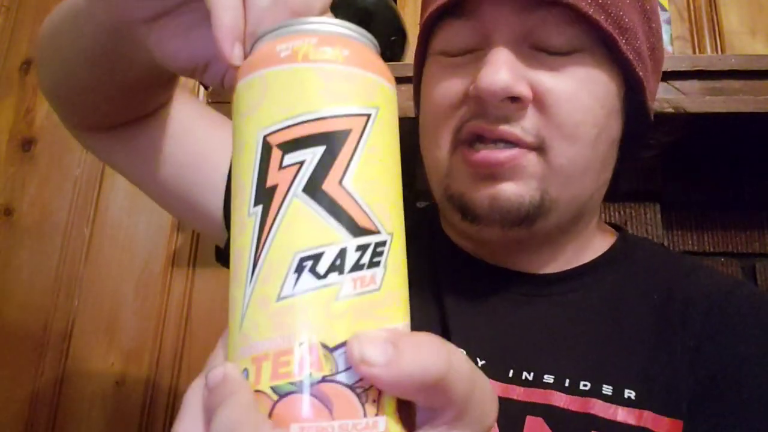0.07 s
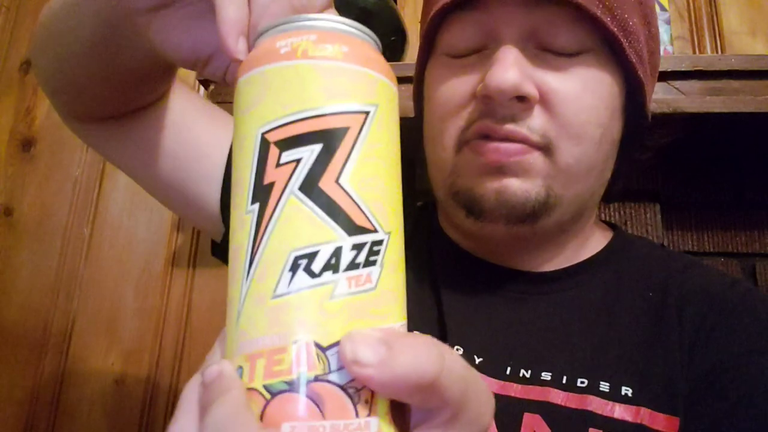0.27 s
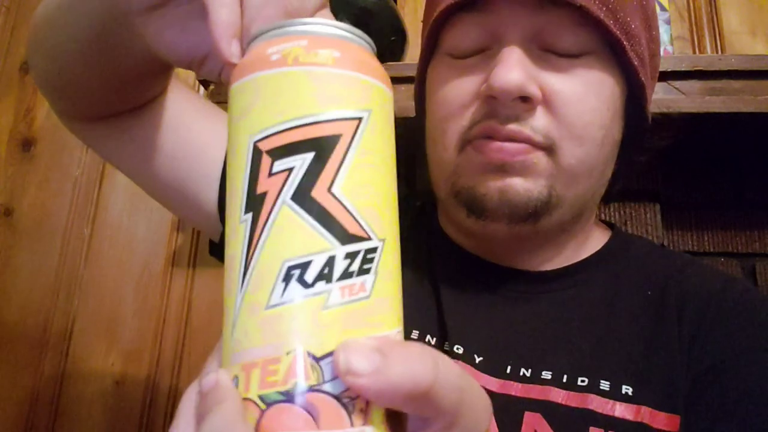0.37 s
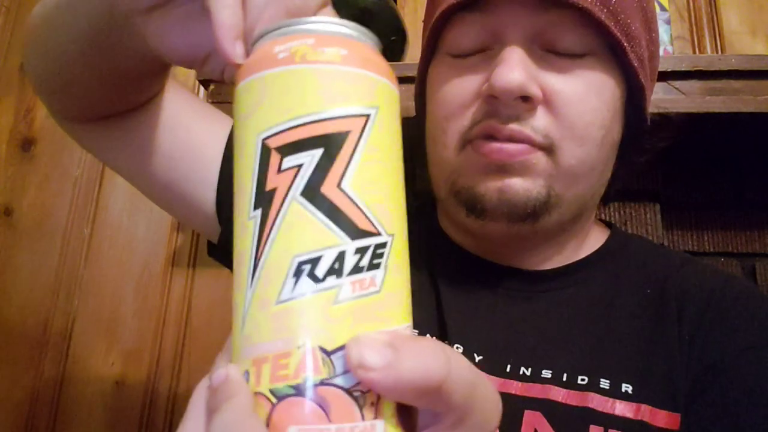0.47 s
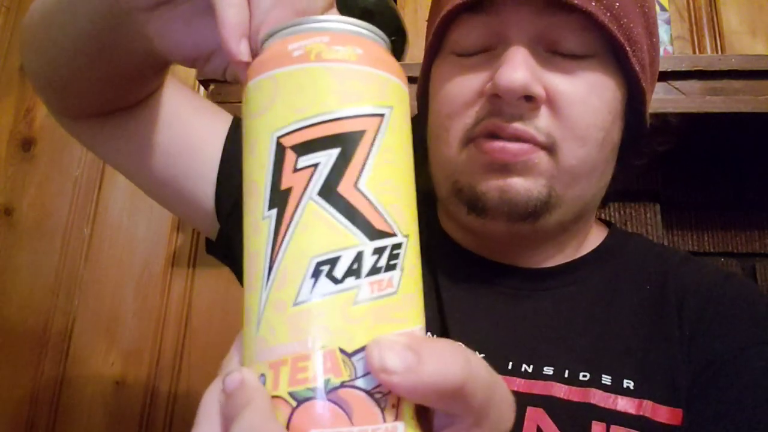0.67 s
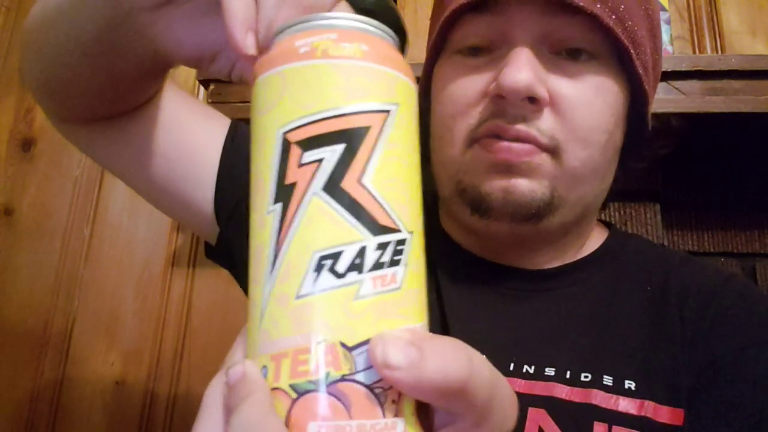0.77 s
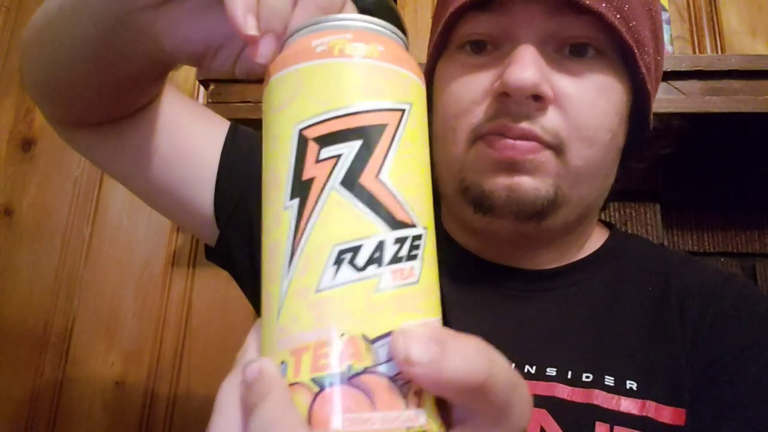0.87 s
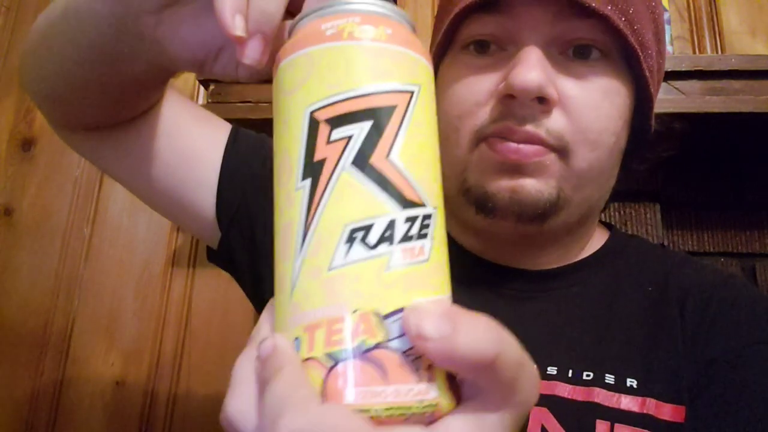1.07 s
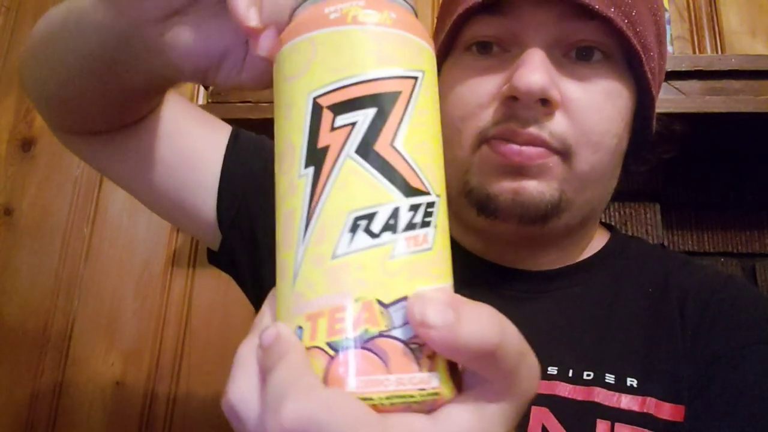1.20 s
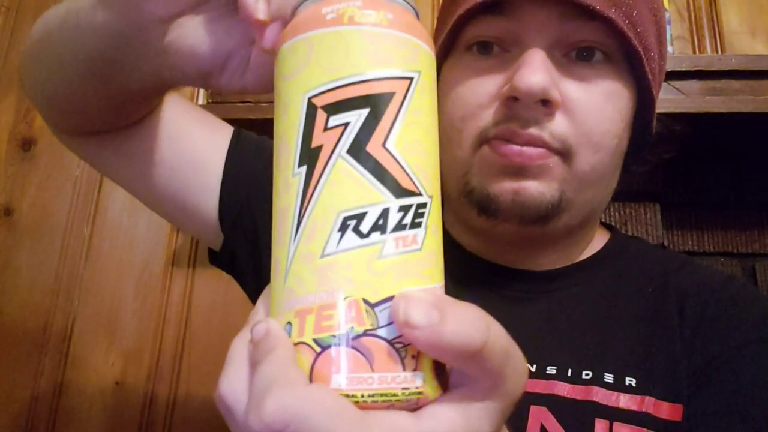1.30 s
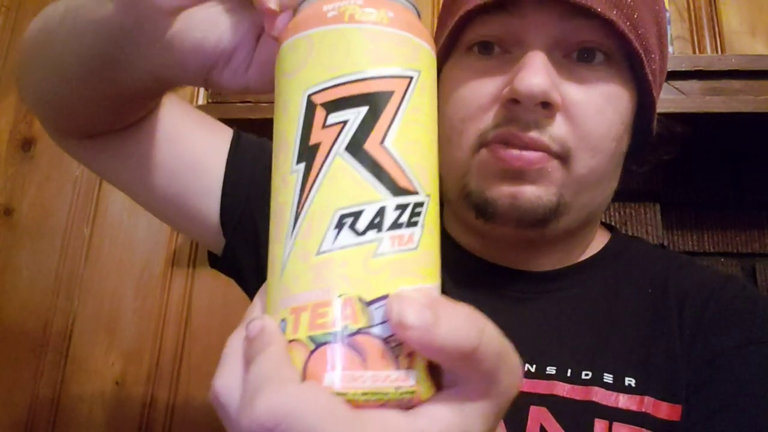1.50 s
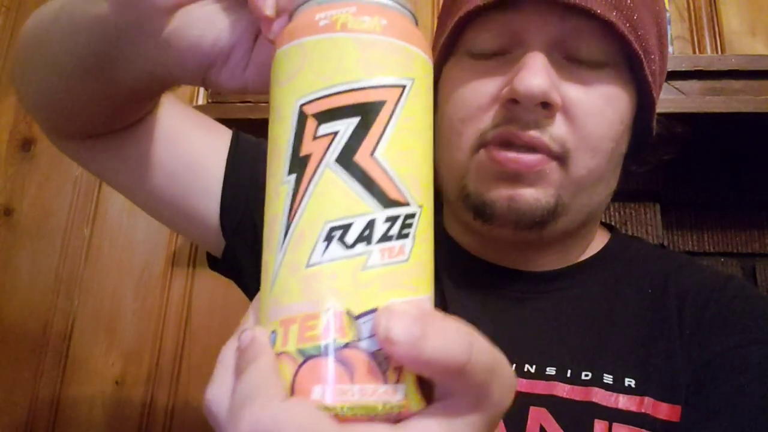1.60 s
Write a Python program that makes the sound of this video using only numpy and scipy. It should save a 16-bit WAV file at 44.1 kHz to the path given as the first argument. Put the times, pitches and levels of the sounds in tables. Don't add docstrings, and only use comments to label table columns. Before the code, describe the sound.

Fingernail picking a full can's tab: one bright click, later weaker clicks, over faint hiss

```python
import sys
import numpy as np
from scipy import signal
from scipy.fft import rfft, irfft
from scipy.io import wavfile
from scipy.ndimage import uniform_filter1d

SR = 44100
rng = np.random.default_rng(int(sys.argv[2]) if len(sys.argv) > 2 else 0)


def invert_db(level):
    return 10 ** (np.asarray(level, dtype=float) / 20)


def file_out(sig):
    cols = np.atleast_2d(sig).T
    lim = np.clip(cols, -1, 1)
    pcm = np.round(lim * 32767).astype(np.int16)
    wavfile.write(sys.argv[1], SR, pcm)


N = 72765

# (time [s], peak level [dB], treble [dB], low treble [dB], bass [dB])
NAIL_SLIPS = [(0.0181, -55.5, -14, 13.5, 14.5), (0.1898, -33.5, -15, 9.5, 15.5), (.2036, -15, 7, -19, -6.5),
              (.2038, -9, 0.5, 0.5, -10), (.2040, -13.5, 1.5, 1, -2), (0.205, -18.5, 5.5, 7.5, 0.5),
              (.630, -62, -12, 4.5, 0), (.8137, -31, -16.5, 10, 16), (1.018, -74, -12, 0, 28),
              (1.477, -59.5, 4, 2.5, -1.5), (1.530, -59, -12, -1.5, 0), (1.581, -56.5, -5, 4, 2.5),
              (1.594, -26.5, -6, -2, 4), (1.5950, -30.5, -4, 0.5, 2), (1.5987, -30.5, -1.5, -1, 3.5),
              (1.6008, -27, -3.5, -2, 3)]
# (pitch [Hz], width [Hz], left level [dB], right level [dB])
CAN_RINGS = [(735, 160, -36.5, -49.5), (1600, 500, -30.5, -42), (2300, 430, -24.5, -36),
             (3330, 580, -10.5, -26.5), (4130, 550, -6.5, -21), (5200, 610, 1.5, -18),
             (6000, 1200, -16, -32), (10330, 740, -20, -13.5), (12300, 1400, -19.5, -3),
             (13700, 1100, -15, -3), (15300, 1500, -19.5, -10)]
# (time [s], pitch [Hz], width [Hz], level [dB], left over right [dB])
EXTRA_RINGS = [(.0185, 5000, 300, -66, 12.5), (.2037, 1600, 295, -42, 13), (.2037, 1050, 404, -47, 13),
               (.2038, 5000, 1500, -15, 17), (.2042, 12300, 505, -20.5, -13.5),
               (.2044, 15400, 700, -27.5, -11.5), (.630, 5000, 297.3, -65, 13.5),
               (.8136, 522.5, 200.5, -59, 14.5), (.8136, 6630, 890, -48, 18),
               (.8136, 11000, 1200, -50.5, -8), (1.018, 1500, 250, -59, 15),
               (1.477, 14550, 1300, -47.5, -5), (1.5944, 9740, 900, -38.5, -19),
               (1.5999, 4320, 250, -37, 10), (1.6002, 2360, 297, -48, 13.5), (1.606, 4640, 300, -37.5, 13),
               (1.612, 758, 71, -56, 15.5)]
# (start [s], end [s], pitch [Hz], width [Hz], level [dB])
SKIN_RUB = (.05, .2, 1620, 120, -83)
# (pitch [Hz], time to fall 60 dB [s], left level [dB], right level [dB])
ROOM_TAIL = [(600, .3, -19, -13), (1500, .3, -20.5, -15.5), (3000, .32, -21, -15.5),
             (5000, .33, -22.5, -18), (7506, .28, -22, -15), (13000, .25, -19, -22.5)]
# (delay [s], level [dB])
WALL_ECHOES = [(.0070, -13.5), (.0085, -17), (.0150, -18.5), (0.0222, -20)]
# (time [s], level [dB])
MOTOR_LOAD = [(0.0, -72), (0.064, -71.5), (0.096, -81), (0.426, -56.5), (0.578, -64), (0.61, -73),
              (0.738, -62.5), (0.78, -76.5), (0.822, -67), (1.506, -71.5), (1.63, -67.5), (1.65, -90)]
# (pitch [Hz], width [Hz], level [dB])
MOTOR_DRONES = [(80.46, 61, -77), (115, 25, -79), (144, 22, -74), (180, 31, -81), (40, 30, -82)]
# (pitch [Hz], level per Hz [dB])
HISS_COLOUR = [(200, 2), (450, -5), (1400, -10.5), (3200, -14.5), (5500, -19), (8500, -22.5),
               (12500, -15.5), (16000, -18.5)]
# (pitch [Hz], left over right [dB])
HISS_SIDE = [(200, 7), (700, 6.5), (2400, 11.5), (4400, 8.5), (8100, 2.5), (15000, 1.5)]
# (pitch [Hz], likeness [0 to 1])
HISS_LIKENESS = [(100, .85), (300, 0.79), (650, .2), (1400, 0.01)]
# (pitch [Hz], width [Hz], level [dB])
HISS_BUMPS = [(1050, 200, 5.5), (2260, 500, 4)]

PATHS = 3


def ring(x, hz, width_hz):
    radius = np.exp(-np.pi * width_hz / SR)
    turn = 2 * np.pi * min(hz, 20000) / SR
    feed = [np.sin(turn), 0, -np.sin(turn)]
    memory = [1, -2 * radius * np.cos(turn), radius * radius]
    return signal.lfilter(feed, memory, x + 1e-18) / (2 * np.sin(turn))


def tab():
    bass_top_hz, middle_top_hz, treble_foot_hz = 2800, 4700, 8000
    spread_db = 2.39
    s, db, treble_db, middle_db, bass_db = np.transpose(NAIL_SLIPS)
    luck = rng.standard_normal((len(s), len(CAN_RINGS)))
    path = np.arange(len(s)) % PATHS
    out = np.zeros((PATHS, 2, N))
    for k, (hz, width_hz, left_db, right_db) in enumerate(CAN_RINGS):
        if hz < bass_top_hz:
            tilt_db = bass_db
        elif hz < middle_top_hz:
            tilt_db = middle_db
        elif hz > treble_foot_hz:
            tilt_db = treble_db
        else:
            tilt_db = 0
        strength = invert_db(db + tilt_db + spread_db * luck[:, k])
        clicks = np.zeros((PATHS, 1, N))
        clicks[path, 0, (s * SR).astype(int)] = strength * (-1) ** k
        out += ring(clicks, hz, width_hz) * invert_db(np.array([[left_db], [right_db]]))
    return signal.sosfilt(signal.butter(2, 598.8, "high", fs=SR, output="sos"), out)


def accents():
    out = np.zeros((PATHS, 2, N))
    for k, (s, hz, width_hz, db, pan_db) in enumerate(EXTRA_RINGS):
        click = np.zeros(N)
        click[int(s * SR)] = invert_db(db)
        out[k % PATHS] += ring(click, hz, width_hz) * invert_db(np.array([[.5], [-.5]]) * pan_db)
    return out


def at_hz(points, hz, axis=1):
    p = np.array(points)
    return np.interp(np.log(hz), np.log(p[:, 0]), p[:, axis])


def room(x):
    tail_start_s, tail_rise_s = .002, 0.00611
    t = np.arange(SR // 2) / SR
    swell = np.clip((t - tail_start_s) / tail_rise_s, 0, 1)
    answer = np.zeros((PATHS, 2, len(t)))
    edges = 300 * 2 ** np.arange(0, 6.1, .5)
    white = rng.standard_normal((2, PATHS, 2, len(t)))
    for k, (low, high) in enumerate(zip(edges, edges[1:])):
        hz = np.sqrt(low * high)
        band = signal.butter(2, [low, high], "band", fs=SR, output="sos")
        noise = signal.sosfilt(band, white[k % 2])
        sides_db = np.array([[at_hz(ROOM_TAIL, hz, axis=2)], [at_hz(ROOM_TAIL, hz, axis=3)]])
        fade = invert_db(-60 * t / at_hz(ROOM_TAIL, hz))
        answer += noise * invert_db(sides_db - 9) * swell * fade
    for delay, db in WALL_ECHOES:
        i = int(delay * SR)
        burst = rng.standard_normal((PATHS, 2, 30)) * np.exp(-np.arange(30) / 8)
        answer[..., i:i + 30] += invert_db(db - 6) * burst
    return signal.fftconvolve(x, answer, axes=2)[..., :N].sum(axis=0)


def pair(alike, pan_db, size):
    mid, side = rfft(rng.standard_normal((2, size)))
    alike = np.clip(alike, 0, .99)
    sign = np.array([[1], [-1]])
    both = np.sqrt(1 + alike) * mid + sign * np.sqrt(1 - alike) * side
    return both * invert_db(sign * pan_db / 2)


LOW_PAN_DB, LOW_ALIKE = 6.5, .7


def narrow(c_hz, width_hz):
    hz = np.fft.rfftfreq(N, 1 / SR)
    peak = 1 + ((hz - c_hz) / (width_hz / 2)) ** 2
    out = irfft(pair(LOW_ALIKE, LOW_PAN_DB, N) / peak, N)
    return out / np.std(out.mean(axis=0))


def squeak():
    start, end, hz, width_hz, db = SKIN_RUB
    share = np.clip((np.arange(N) / SR - start) / (end - start), 0, 1)
    return invert_db(db) * np.sin(np.pi * share) * narrow(hz, width_hz)


def rumble():
    motor_hz, motor_width_hz = 56.4, 6.4
    tone_share, drone_follows = .75, 0.23
    t = np.arange(N) / SR
    sides = invert_db(np.array([[.4], [-.6]]) * LOW_PAN_DB)
    tone = 1.6 * np.sin(2 * np.pi * motor_hz * t) * sides
    wavering = narrow(motor_hz, motor_width_hz)
    motor = np.sqrt(tone_share) * tone + np.sqrt(1 - tone_share) * wavering
    load_db = np.interp(t, *np.transpose(MOTOR_LOAD))
    drones = sum(invert_db(db) * narrow(hz, width_hz) for hz, width_hz, db in MOTOR_DRONES)
    drone_load_db = drone_follows * (load_db - load_db.mean())
    return invert_db(load_db) * motor + invert_db(drone_load_db) * drones


def hiss():
    hz = np.fft.rfftfreq(N, 1 / SR) + 1
    humps_db = sum(db * np.exp(-((hz - c_hz) / w_hz) ** 2) for c_hz, w_hz, db in HISS_BUMPS)
    low_cut = np.sqrt(1 + (170 / hz) ** 8)
    shape = invert_db(at_hz(HISS_COLOUR, hz) + humps_db) / low_cut
    noise = pair(at_hz(HISS_LIKENESS, hz), at_hz(HISS_SIDE, hz), N)
    out = irfft(noise * shape, N)
    return invert_db(-76.5) * out / np.std(out.mean(axis=0))


def scene():
    shaded_below_db, shade_db = -46, -5.5
    snaps = tab() + accents()
    loudness = uniform_filter1d(np.abs(snaps).sum(axis=(0, 1)), size=200)
    in_view = loudness > invert_db(shaded_below_db - 10)
    direct = snaps.sum(axis=0) * np.where(in_view, 1, invert_db(shade_db))
    return direct + room(snaps) + squeak() + rumble() + hiss()


def roll_off(x):
    return signal.sosfilt(signal.butter(12, 16620, fs=SR, output="sos"), x)


def record(dry):
    low_hz, top_hz = 28, 16800
    dip_hz, dip_sharpness, dip_share = 8680, 3.0, .45
    mix = signal.sosfilt(signal.butter(2, low_hz, "high", fs=SR, output="sos"), dry)
    mix = mix - dip_share * signal.lfilter(*signal.iirpeak(dip_hz, dip_sharpness, fs=SR), mix)
    mix = signal.sosfilt(signal.cheby2(12, 50, top_hz, fs=SR, output="sos"), mix)
    return roll_off(mix)


dry = scene()
out = record(dry)
file_out(out)
```